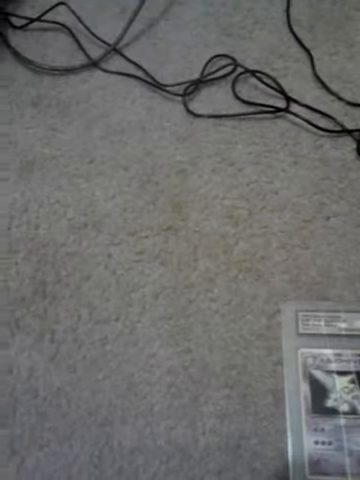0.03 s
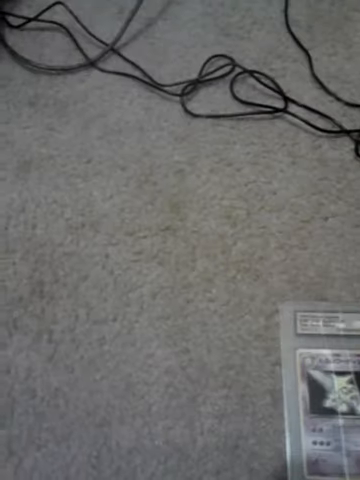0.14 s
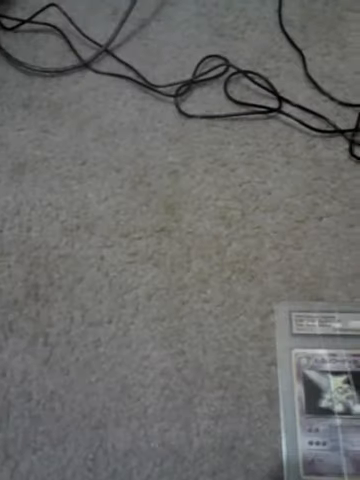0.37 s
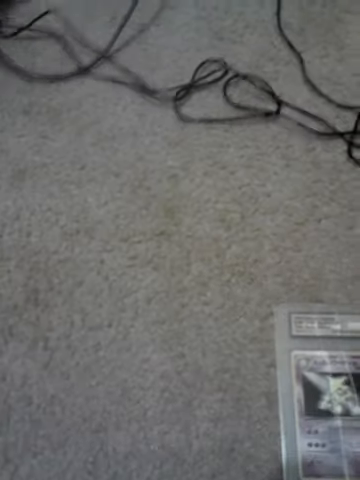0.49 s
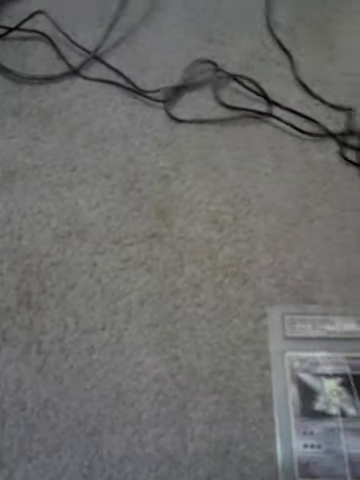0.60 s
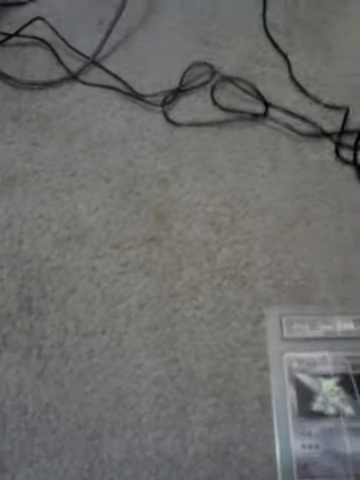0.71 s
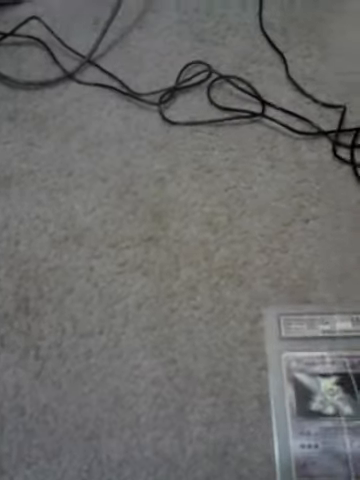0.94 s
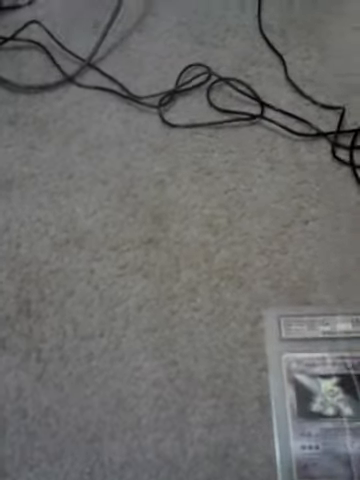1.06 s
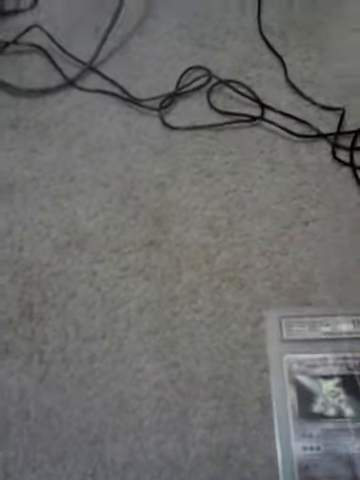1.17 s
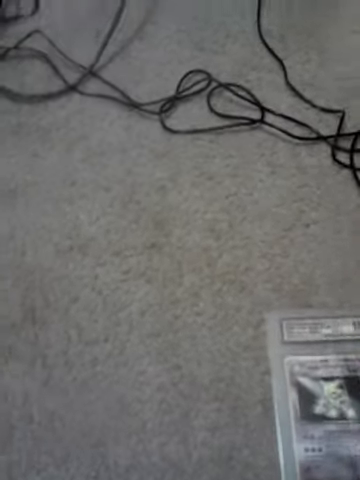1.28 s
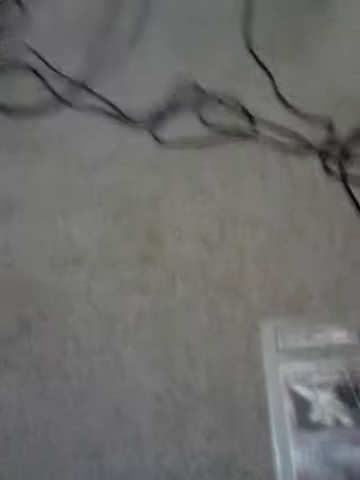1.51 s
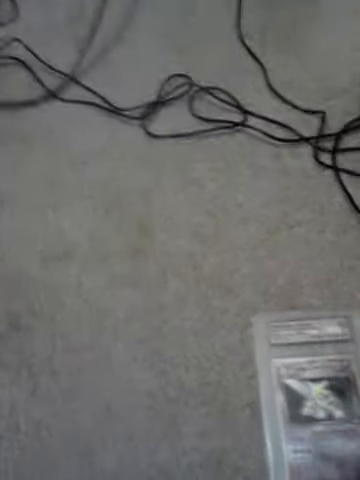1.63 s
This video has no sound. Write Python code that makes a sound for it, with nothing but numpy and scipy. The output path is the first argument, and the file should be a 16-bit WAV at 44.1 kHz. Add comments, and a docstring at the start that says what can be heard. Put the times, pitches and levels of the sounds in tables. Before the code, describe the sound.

A thin plastic binder sleeve crinkles and snaps as a card slides out, close by in a quiet room. Soft finger taps lead into a rubbing hiss at about 0.4 seconds. Three sharp snaps fall between 0.4 and 0.75 seconds, the loudest at 0.5. Light crinkles and tiny squeaks follow from 0.8 to 1.25. The page flops down at 1.3 seconds, followed by a few faint ticks.

```python
"""A card leaves its plastic pocket

Close by in a quiet carpeted room, fingers tap and grip the sleeve of a binder page.
The card rubs along it with a hiss and a rasp. The thin plastic film buckles, so it snaps
and crinkles, and it sticks and slips, so it squeaks. At last the page flops down as the
card comes free."""
import sys
import numpy as np
from scipy import signal
from scipy.fft import rfft, irfft, next_fast_len
from scipy.io import wavfile
from scipy.ndimage import map_coordinates

SR = 44100
rng = np.random.default_rng(int(sys.argv[2]) if len(sys.argv) > 2 else 0)


def unload_wav(signal):
    """Save mono or channel-first audio to the path in sys.argv[1] as 16-bit WAV at rate SR, clipped to [-1, 1]."""
    wavfile.write(
        sys.argv[1],
        SR,
        np.round(np.clip(np.atleast_2d(signal).T, -1, 1) * 32767).astype(np.int16),
    )


N = 74970

# Tone of the room's steady noise and of its echo: (frequency [Hz], gain [dB])
BACKGROUND_TONE = [(20, -8.5), (45, -11), (70, -9.5), (150, -20.5), (400, -24), (2000, -25.5), (15500, -25)]
ECHO_TONE = [(100, -5.5), (600, -3.5), (2500, 3), (7000, 0.5), (15000, -41)]

# Soft knocks: (time [s], level [dB], pitch [Hz], fade time [s]). A fade time is a drop of 60 dB.
TAP_EVENTS = [(0.0324, -49.5, 556, 0.025), (0.14, -32, 1040, 0.0091), (0.1402, -50, 171, 0.045),
              (0.2356, -32.5, 1030, 0.01), (0.3719, -29.5, 319, 0.027), (1.327, -42, 75, 0.051),
              (1.393, -33, 980, 0.0073)]
# The notes inside one knock: (pitch [ratio], level [dB], fade time [ratio])
TAP_NOTES = [(.2, -21, 1.35), (.65, -10.5, 1.53), (1, -2.5, 0.98), (1.5, 2, 0.34)]
# Tone a fingertip gives a knock: (frequency [Hz], gain [dB])
FINGER_TONE = [(100, -3.5), (400, 1), (1600, 0), (2600, 1.5), (5000, 9)]

# Small ticks of the film: (time [s], peak level [dB], centre frequency [Hz])
CRINKLE_EVENTS = [(0.1413, -47, 2900), (0.2155, -47.5, 2260), (0.3733, -21.5, 8850), (0.3737, -31, 1730),
                  (0.416, -23, 9000), (0.4499, -27, 2160), (0.5414, -33.5, 3630), (0.6059, -38, 3230),
                  (0.7017, -37, 1800), (0.7318, -31, 6060), (0.8972, -31.5, 8300), (0.961, -35, 6540),
                  (1.045, -34.5, 8600), (1.0645, -36.5, 7100), (1.0846, -39, 2700), (1.0894, -38, 2640),
                  (1.097, -33.5, 7500), (1.1216, -36.5, 2570), (1.126, -35, 2600), (1.1314, -40, 2420),
                  (1.2255, -44, 8900), (1.2737, -36, 8100), (1.3311, -26, 5040), (1.3523, -39, 4000),
                  (1.359, -39, 2880), (1.366, -34, 4250), (1.414, -39.5, 4060)]
# Notes of the taut pocket under the pull: (time of peak [s], pitch [Hz], level [dB])
POCKET_NOTES = [(.426, 4690, -39), (.43, 2220, -42), (.443, 3560, -42.5), (.452, 1480, -44)]

# Four squeaky sounds of the film: (time [s], slip rate [1/s], level [dB])
SQUEAK_PATH = [(.841, 3600, -54), (.847, 4100, -35), (.851, 4100, -33.5), (.8555, 3800, -34.5),
               (.8595, 2480, -34.5), (.864, 2800, -34.5), (.867, 3800, -35), (.871, 4800, -40),
               (.874, 4000, -39), (.877, 4500, -35), (.881, 4480, -38), (.887, 4550, -54)]
FAINT_PATH = [(1.029, 1467, -60), (1.037, 1667, -52), (1.046, 1810, -57)]
CREAK_PATH = [(1.158, 945, -43.5), (1.167, 929, -41), (1.178, 835, -42), (1.191, 1067, -40.5),
              (1.197, 1497, -37), (1.207, 1580, -61)]
CHIRP_PATH = [(1.241, 2425, -66), (1.244, 2176, -35.5), (1.2465, 2140, -30.5), (1.2485, 3050, -32),
              (1.25, 2900, -61)]
# Tone the film gives them: (frequency [Hz], gain [dB])
SQUEAK_TONE = [(1500, -21), (2700, -1), (4400, 7.5), (9500, 3), (12200, 12), (13500, -5)]
FAINT_TONE = [(5200, 2), (7000, -19)]
CREAK_TONE = [(500, -25), (1400, -7.5), (2600, -15), (3600, -18.5), (4800, -1.5), (6600, -11.5),
              (8600, 2.5), (11000, -3), (12500, -27)]

# The page touching down: (time [s], thud level [dB], smack level [dB], rough fade time [s])
SLAP_EVENTS = [(1.2788, -47.5, -45, 0.091), (1.2967, -20.5, -21.5, 0.024), (1.303, -34, -25, 0.044),
               (1.3081, -29.5, -28, 0.031)]
# Tone of its low thud and its bright smack: (frequency [Hz], gain [dB])
THUD_TONE = [(40, -12), (110, -21), (165, -4), (300, -4), (560, 2), (850, 1.5), (1300, -4.5), (2400, -11),
             (5000, -44)]
SMACK_TONE = [(600, -50), (1900, -15), (2400, 4.5), (4200, -1), (5300, 10.5), (7000, 7.5), (10000, -4),
              (12500, -7), (16000, -12)]
# Brief notes that colour the quick slaps: (pitch [Hz], level [dB])
SLAP_NOTES = [(527, -39), (617, -40), (820, -39), (990, -39), (1250, -43), (5309, -42)]

# Snaps of the buckling film: (time [s], level [dB], rise time [s])
SNAP_EVENTS = [(0.4041, -19.5, 0.00011), (0.4925, -5.5, 0.0005), (0.7369, -13, 0.000018)]
# One list of notes for each snap: (pitch [Hz], level [dB], fade time [s])
SNAP_NOTES = [
    [(794, -4, 0.0098), (1125, -0.5, 0.0076), (1586, -3.5, 0.018), (2830, 1, .002), (8000, 9, 0.0023),
     (10500, 10, 0.0019)],
    [(574, -31, 0.013), (1350, -13.5, 0.0069), (1920, -13, 0.0063), (2953, 1.5, 0.004), (3410, 5, 0.0037),
     (5130, 2.5, 0.0013), (7770, -7, 0.0035), (11020, 0, 0.0029)],
    [(1040, -9, 0.0051), (2520, -1, 0.0038), (3120, -9, 0.0049), (3500, -11.5, 0.011), (4750, 0.5, 0.0029),
     (5520, -7.5, 0.0053), (6260, -6.5, 0.007), (7170, 1, 0.0054), (9140, -2.5, 0.0048),
     (12200, 3, 0.00066)],
]
# Tone of the soft wash of room sound after each snap: (frequency [Hz], gain [dB])
WASH_TONE = [(170, -25), (350, -7), (5000, 3.5), (10000, -2.5), (16000, -11)]

# The card rubbing on the film: (time [s], hiss level [dB], rasp level [dB])
SLIDE_LEVELS = [(.22, -76, -71), (.25, -63, -61.5), (.32, -68.5, -75), (.368, -92, -69), (.373, -44.5, -55),
                (.385, -32.5, -42), (.398, -42.5, -48.5), (.409, -32, -35), (.428, -38.5, -39.5),
                (.448, -40, -48.5), (.48, -48.5, -50.5), (.56, -55.5, -56.5), (.605, -51, -51.5),
                (.66, -58, -55.5), (.692, -44, -49.5), (.725, -56.5, -51.5), (.765, -46, -46),
                (.82, -53.5, -57), (.9, -53, -57), (.94, -48, -58.5), (1.0, -51.5, -56.5), (1.06, -63, -67),
                (1.09, -54, -57), (1.13, -51.5, -57), (1.155, -56, -54.5), (1.212, -66, -70),
                (1.245, -41, -45.5), (1.262, -51.5, -57.5), (1.28, -35.5, -44), (1.31, -34, -41),
                (1.335, -58.5, -65), (1.365, -65, -51), (1.385, -101, -97)]
# Tone of the high hiss and the lower rasp: (frequency [Hz], gain [dB])
HISS_TONE = [(1500, -17), (3500, -17.5), (5000, -4), (6500, -7), (8700, 2), (10500, -3), (12200, -4),
             (14000, -24), (16000, -18)]
RASP_TONE = [(80, -60), (300, -17.5), (850, -6), (1250, -1), (2000, -3), (3100, -1.5), (4200, -10.5),
             (7000, -16.5)]

BACKGROUND_DB, TOP_HZ, ZERO_OFFSET = -63.5, 15900, -.0055
ECHO_DB, SNAP_ECHO_DB, ECHO_FADE_S, ECHO_BUILD_S = -16.5, -21.5, 0.19, 0.0036
CRINKLE_FADE_S, CRINKLE_STEP_OCTAVES, CRINKLE_SLOPE_DB = .014, 0.63, 5.5
POCKET_SWELL_S, POCKET_WAVER_HZ = .012, 130
SLAP_NOTE_FADE_S, WASH_FADE_S, WASH_DB = .062, 0.18, -38.5
CATCHES_PER_S, CATCH_SPREAD_DB, CATCH_SHARE = 1300, 6, 0.5


def amp(db):
    """Turn decibels into a number to multiply by."""
    return 10 ** (np.asarray(db) / 20)


def unit(x):
    """Scale a sound to an average strength (rms) of 1."""
    return x / np.sqrt(np.mean(x ** 2) + 1e-20)


def curves(rows):
    """Give each column after the time one value per sample."""
    times, *columns = np.transpose(rows)
    return [np.interp(np.arange(N) / SR, times, column) for column in columns]


def wobble(rate):
    """A smooth curve through `rate` random values a second."""
    values = rng.standard_normal(int(N * rate / SR) + 4)
    return map_coordinates(values, [np.arange(N) * rate / SR])


def colour(x, tone):
    """Make some frequencies louder and others softer, following a tone table."""
    size = 2 ** int(np.ceil(np.log2(2 * len(x))))
    hz, db = np.transpose(tone)
    gain_db = np.interp(np.log(np.fft.rfftfreq(size, 1 / SR) + 1), np.log(hz + 1), db)
    cepstrum = irfft(np.log(amp(gain_db)))
    # folding this in half keeps the filter from ringing before a sound starts
    cepstrum[1:size // 2] *= 2
    cepstrum[size // 2 + 1:] = 0
    return irfft(rfft(x, size) * np.exp(rfft(cepstrum)))[:len(x)]


def burst(fade_s, tone):
    """A puff of noise that dies away in roughly fade_s seconds."""
    fade = amp(-60 * np.arange(SR // 10) / SR / fade_s)
    puff = fade * rng.standard_normal(len(fade))
    even = irfft(np.exp(1j * np.angle(rfft(puff))))  # all frequencies equally strong
    return unit(colour(even * np.sqrt(fade), tone)) * np.sqrt(np.mean(fade ** 2))


def fading_notes(notes, rise_s):
    """Several notes start together and fade; every second wave is flipped."""
    t = np.arange(SR // 10) / SR
    waves = sum((-1) ** k * amp(db - 60 * t / fade_s) * np.sin(2 * np.pi * hz * t)
                for k, (hz, db, fade_s) in enumerate(notes))
    return (1 - np.exp(-t / rise_s)) * waves


def add(out, time, x):
    """Mix x into out, starting at a time in seconds."""
    part = out[round(time * SR):][:len(x)]
    part += x[:len(part)]


def background():
    """The quiet room has a steady low rumble and a faint hiss."""
    return amp(BACKGROUND_DB) * unit(colour(rng.standard_normal(N), BACKGROUND_TONE))


def room_echo(x):
    """The walls send back a short wash of sound."""
    t = np.arange(SR // 3) / SR
    tail = rng.standard_normal(len(t)) * amp(-60 * t / ECHO_FADE_S) * (1 - np.exp(-t / ECHO_BUILD_S))
    return colour(signal.fftconvolve(x, tail / np.linalg.norm(tail))[:N], ECHO_TONE)


def finger_taps():
    """Fingertips and the binder itself knock dully."""
    out = np.zeros(N)
    for time, db, hz, fade_s in TAP_EVENTS:
        notes = [(hz * ratio, level, fade_s * life) for ratio, level, life in TAP_NOTES]
        add(out, time, amp(db) * fading_notes(notes, rise_s=0.000085))
    return colour(out, FINGER_TONE)


def film_crinkles():
    """The film crinkles in many small ticks, each a tiny puff of noise."""
    out = np.zeros(N)
    for time, db, hz in CRINKLE_EVENTS:
        # strongest at hz, falling gently below it and steeply above
        band = [(hz * 2 ** (k * CRINKLE_STEP_OCTAVES), -CRINKLE_SLOPE_DB * (k * k if k > 0 else -k))
                for k in range(-6, 4)]
        tick = burst(CRINKLE_FADE_S, band)
        add(out, time - CRINKLE_FADE_S / 20, amp(db) * tick / np.abs(tick).max())
    return out


def pocket_ringing():
    """Rubbing makes the taut film ring; each note swells, wavers and fades."""
    t = np.arange(N) / SR
    out = np.zeros(N)
    for time, hz, db in POCKET_NOTES:
        phase = 2 * np.pi * np.cumsum(hz + POCKET_WAVER_HZ * wobble(600)) / SR
        swell = np.exp(-((t - time) / POCKET_SWELL_S) ** 2)
        out += amp(db + 1.1 * wobble(400)) * swell * unit(np.sin(phase))
    return out


def squeak(path, tone, jitter, flutter_db, scrape_db):
    """The film sticks and slips so fast that the uneven pulses make a note, with a scraping hiss."""
    span = slice(round(path[0][0] * SR), round(path[-1][0] * SR))
    rate, db = (curve[span] for curve in curves(path))
    rate = rate * np.exp(jitter * wobble(1500)[span])
    phase = 2 * np.pi * np.cumsum(rate) / SR
    pulses = sum(np.cos(k * phase) * (k * rate < TOP_HZ) for k in np.arange(1, 20))
    note = unit(colour(pulses * amp(flutter_db * wobble(700)[span]), tone))
    scrape = unit(colour(rng.standard_normal(N)[span], HISS_TONE))
    out = np.zeros(N)
    out[span] = amp(db) * (note + amp(scrape_db) * scrape)
    return out


def page_flop():
    """The page brushes down and lands in three quick slaps, coloured by brief notes."""
    out = np.zeros(N)
    for time, thud_db, smack_db, fade_s in SLAP_EVENTS:
        add(out, time, amp(thud_db) * burst(fade_s, THUD_TONE))
        add(out, time, amp(smack_db) * burst(fade_s, SMACK_TONE))
    notes = [(hz, db, SLAP_NOTE_FADE_S) for hz, db in SLAP_NOTES]
    add(out, SLAP_EVENTS[0][0], fading_notes(notes, rise_s=0.00074))
    return out


def film_snaps():
    """The film buckles with a sharp snap, and a soft wash of room sound fades after it."""
    out = np.zeros(N)
    for (time, db, rise_s), notes in zip(SNAP_EVENTS, SNAP_NOTES):
        snap = -amp(db) * fading_notes(notes, rise_s)
        wash = amp(WASH_DB) * burst(WASH_FADE_S, WASH_TONE)
        add(out, time, snap + wash)
    return out


def rub(tone, flutter_db=2.5):
    """Rubbing surfaces catch in tiny clicks over a smooth rush of noise."""
    clicks = (rng.random(N) < CATCHES_PER_S / SR) * rng.choice([-1, 1], N)
    strength = amp(CATCH_SPREAD_DB * np.minimum(rng.exponential(size=N), 3))
    catches = np.sqrt(CATCH_SHARE) * unit(clicks * strength)
    rush = np.sqrt(1 - CATCH_SHARE) * rng.standard_normal(N)
    return unit(colour(catches + rush, tone) * amp(flutter_db * wobble(110)))


def card_slide():
    """The card rubs along the pocket with a high hiss and a lower rasp."""
    hiss_db, rasp_db = curves(SLIDE_LEVELS)
    return amp(hiss_db) * rub(HISS_TONE) + amp(rasp_db) * rub(RASP_TONE)


def scene():
    """Mix the handling, its echo and the background into one channel."""
    squeaks = (squeak(SQUEAK_PATH, SQUEAK_TONE, jitter=.028, flutter_db=1.2, scrape_db=-7)
               + squeak(FAINT_PATH, FAINT_TONE, jitter=0.056, flutter_db=4, scrape_db=-13)
               + squeak(CREAK_PATH, CREAK_TONE, jitter=0.089, flutter_db=2.5, scrape_db=-23)
               + squeak(CHIRP_PATH, CREAK_TONE, jitter=0.022, flutter_db=-1.5, scrape_db=-4.5))
    handling = card_slide() + pocket_ringing() + film_crinkles() + finger_taps() + page_flop() + squeaks
    snaps = film_snaps()
    room_noise = background()
    echo = room_echo(amp(ECHO_DB) * handling + amp(SNAP_ECHO_DB) * snaps)
    return (handling + snaps + echo + room_noise)[None]


def record(dry):
    """Cut everything above TOP_HZ and shift the wave slightly below zero."""
    size = next_fast_len(N + SR // 2)
    kept = np.fft.rfftfreq(size, 1 / SR) < TOP_HZ
    return irfft(rfft(dry, size) * kept, size)[:, :N] + ZERO_OFFSET


dry = scene()
out = record(dry)
unload_wav(out)
```